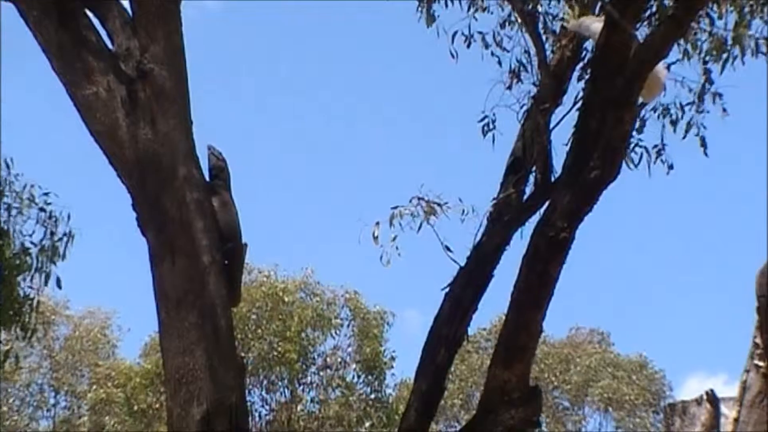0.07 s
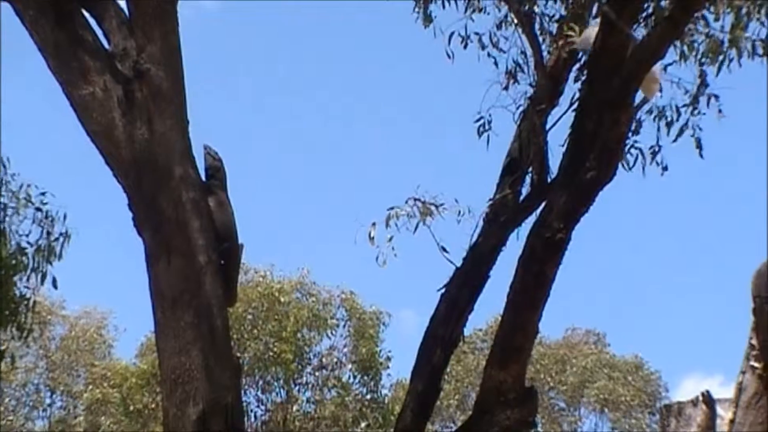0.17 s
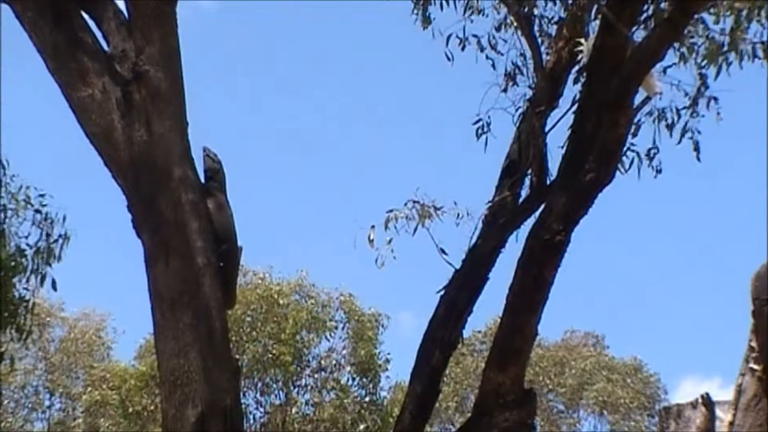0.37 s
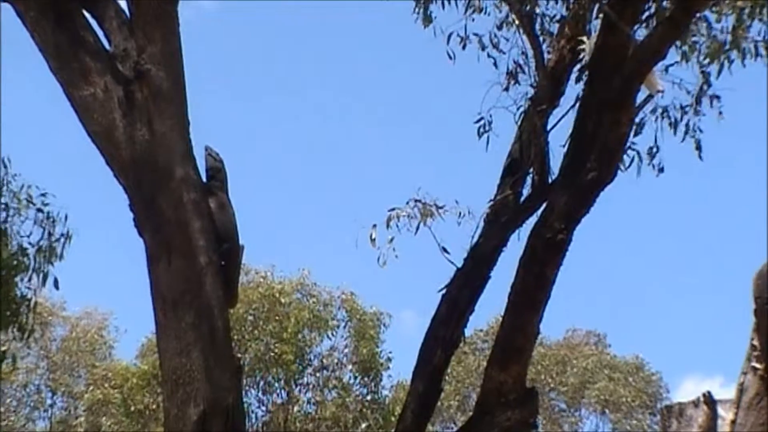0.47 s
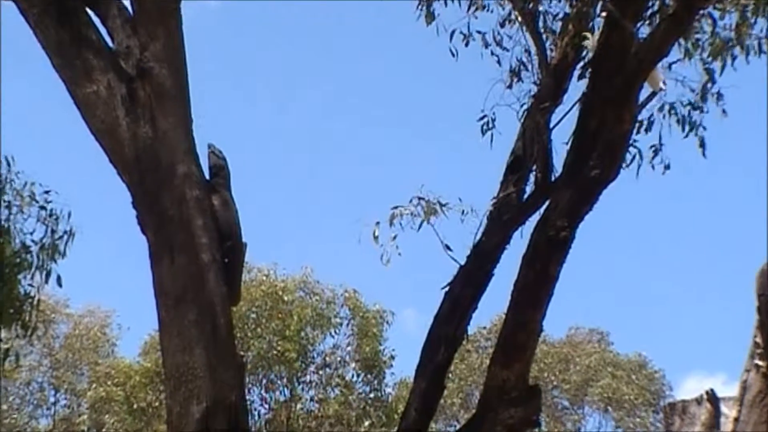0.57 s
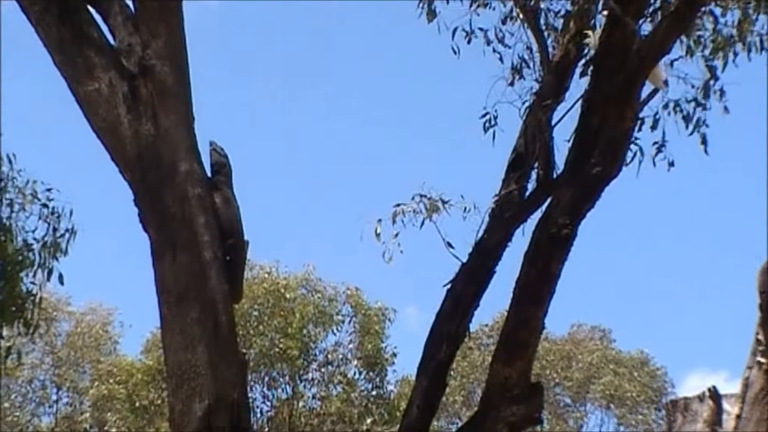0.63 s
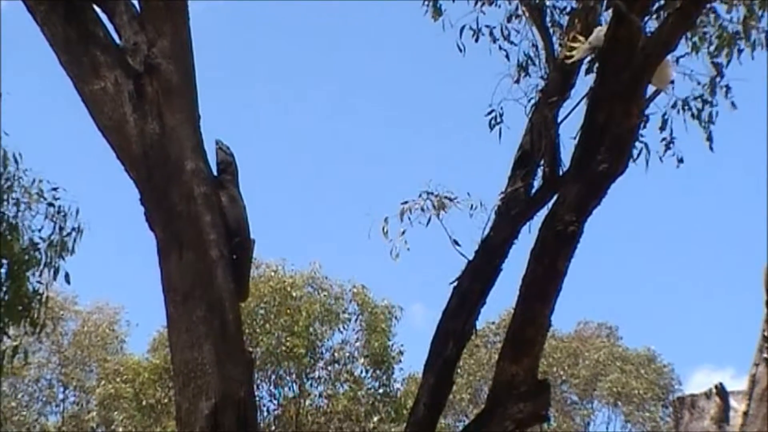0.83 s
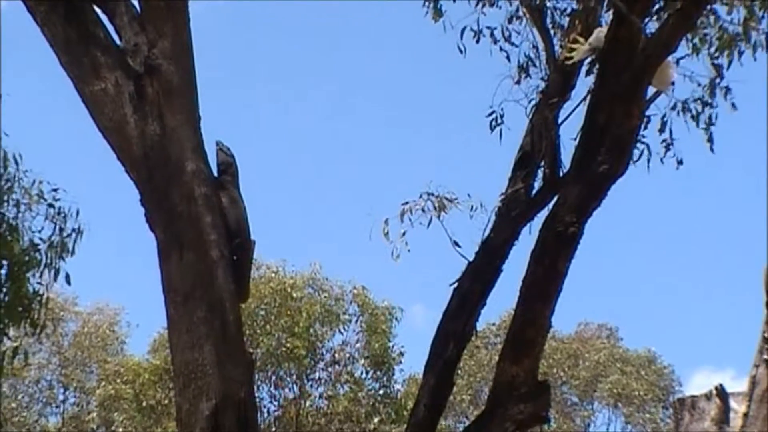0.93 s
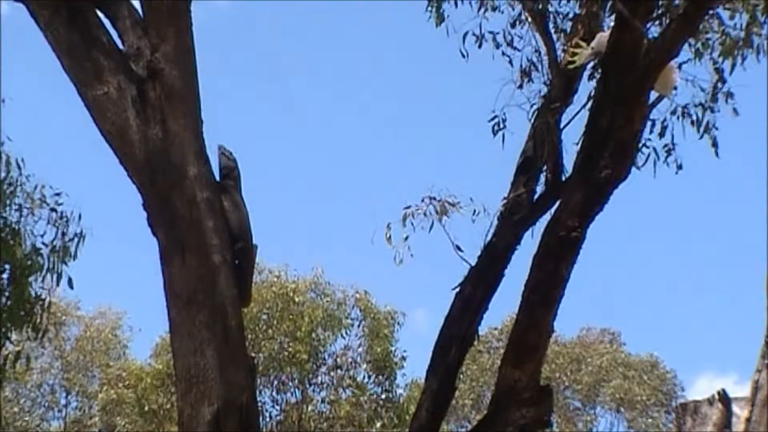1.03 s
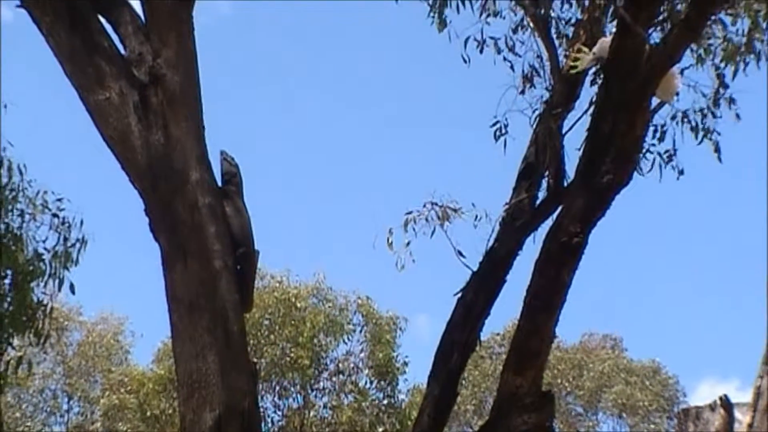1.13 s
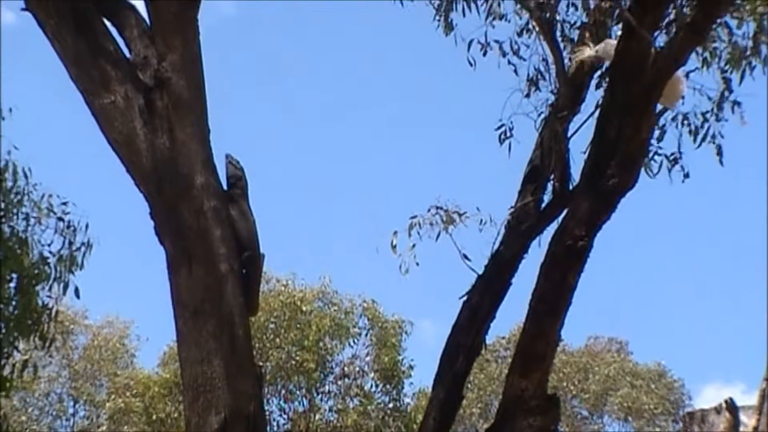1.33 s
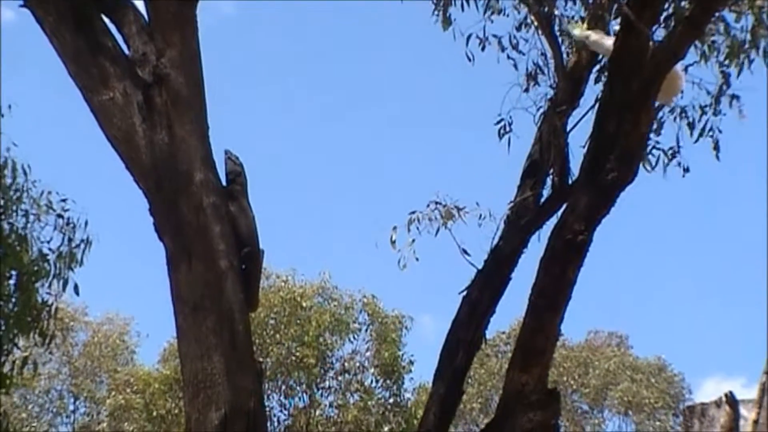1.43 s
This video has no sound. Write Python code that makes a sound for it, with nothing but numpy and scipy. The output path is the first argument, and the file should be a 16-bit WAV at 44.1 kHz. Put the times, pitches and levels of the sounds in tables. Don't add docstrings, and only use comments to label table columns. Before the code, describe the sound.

A large parrot gives one loud, harsh, raspy screech among trees, with a faint echo outdoors

```python
import sys
import numpy as np
from scipy import signal
from scipy.fft import rfft, irfft
from scipy.io import wavfile
from scipy.ndimage import uniform_filter1d

SR = 44100
rng = np.random.default_rng(int(sys.argv[2]) if len(sys.argv) > 2 else 0)


def to_wav(s):
    ch = np.atleast_2d(s).T
    pcm = np.round(np.clip(ch, -1, 1) * 32767)
    wavfile.write(sys.argv[1], SR, pcm.astype(np.int16))


def volts_from_decibels(level):
    exponent = np.asarray(level, float) / 20
    return 10 ** exponent


N = 66150


def evened(x):
    return x / np.sqrt(np.mean(abs(x) ** 2) + 1e-20)


def read(points, hz):
    f, value = np.transpose(points)
    return np.interp(np.log(hz + 1), np.log(f + 1), value)


def resonate(x, hz, width_hz):
    turn = np.exp(2j * np.pi * hz * np.arange(x.shape[-1]) / SR)
    r = np.exp(-np.pi * width_hz / SR)
    return 2 * (turn * signal.lfilter([1 - r], [1, -r], x / turn)).real


def drift(n, hz):
    r = np.exp(-2 * np.pi * hz / SR)
    z = rng.standard_normal(n) + 1j * rng.standard_normal(n)
    return evened(signal.lfilter([1], [1, -2 * r, r * r], z))


def high_pass(x, order, hz):
    return signal.lfilter(*signal.butter(order, hz, 'high', fs=SR), x)


HUM_HZ, HUM_DB, HUM_WANDER, HUM_SWELL_DB = 80, -48.5, 0.077, 2
BUFFET_DB, BUFFET_HZ = -50, 22


def rumble():
    turns = np.cumsum(HUM_HZ * (1 + HUM_WANDER * drift(N, 5.5).real)) / SR
    hum = []
    for _ in range(2):
        phase = 2 * np.pi * turns + 1.45 * drift(N, 2.3).real
        hum.append(np.cos(phase) * volts_from_decibels(HUM_SWELL_DB * drift(N, 8.6).real))
    wind = drift(N, BUFFET_HZ).real
    wind = evened(signal.lfilter(*signal.butter(2, 45, fs=SR), wind))
    return volts_from_decibels(HUM_DB) * np.array(hum) * volts_from_decibels([[3], [0]]) + volts_from_decibels(BUFFET_DB) * wind * [[1.15], [-.85]]


# f/Hz, level per Hz/dB
AIR_SPECTRUM = [(35, -18), (90, -8), (160, -14), (400, -18), (1200, -22), (3000, -31.5), (6500, -36),
                (12500, -49)]
# f/Hz, left-right correlation [-1 to 1]
COHERENCE = [(25, -0.55), (70, 1), (400, -0.35), (8000, -0.41)]
AIR_DB, AIR_TOP_HZ, PATCH_DB = -45, 12700, 1.5
INSECT_HZ, INSECT_WIDTH_HZ, INSECT_DB = 10070, 1970, -46.5


def air():
    frames, hz = N // 512 + 5, np.fft.rfftfreq(2048, 1 / SR)
    a, b, c, d, patches = rng.standard_normal((frames, 1025, 5)).T
    patches = evened(uniform_filter1d(uniform_filter1d(patches, 16, 0), 8, 1))
    same = np.clip(read(COHERENCE, hz), -1, 1)[:, None]
    left = a + 1j * b
    right = same * left + np.sqrt(1 - same ** 2) * (c + 1j * d)
    z = np.array([left, right])
    wash = volts_from_decibels(AIR_DB) * evened(volts_from_decibels(read(AIR_SPECTRUM, hz)))
    hiss = volts_from_decibels(INSECT_DB) * evened(np.exp(-((hz - INSECT_HZ) / INSECT_WIDTH_HZ) ** 2))
    top = 1 / np.sqrt(1 + (hz / AIR_TOP_HZ) ** 70)
    colour = np.hypot(wash, hiss) * top * np.minimum(hz / 60, 1) ** 3
    unit = evened(z * volts_from_decibels(PATCH_DB * patches)) * np.sqrt(2 / 2048)
    sound = signal.istft(unit * colour[:, None], nperseg=2048, noverlap=1536)[1][:, :N]
    return evened(sound) * np.hypot(volts_from_decibels(AIR_DB), volts_from_decibels(INSECT_DB)) * volts_from_decibels([[1.2], [-1.2]])


# t/s, level/dB, ring f/Hz, ring width/Hz, decay time/s
TICKS = [
    (1.049, -41, 9000, 9000, .003),
    (1.19, -43, 3500, 600, .012),
    (1.206, -50, 7000, 4000, .005),
    (1.17, -53, 6500, 4000, .06),
    (1.235, -55, 6500, 4000, .04),
    (1.215, -43, 2330, 500, .045),
    (1.493, -37, 800, 900, .004),
]


def twigs():
    out = np.zeros((2, N))
    t = np.arange(6000) / SR
    for s, db, hz, width_hz, length in TICKS:
        noise = rng.standard_normal(6000)
        burst = evened(resonate(resonate(noise, hz, width_hz), hz, width_hz))
        burst = burst * np.exp(-t / length) * np.minimum(5 * t / length, 1)
        part = out[:, round(s * SR):][:, :6000]
        part += volts_from_decibels(db) * burst[:part.shape[1]]
    return out


SWAY_HZ, SWAY_FROM_HZ = 120, 1400


def swayed(x):
    low = signal.filtfilt(*signal.butter(3, SWAY_FROM_HZ, fs=SR), x)
    return low + (x - low) * drift(N, SWAY_HZ).real * np.sqrt(2)


def sparse(length):
    taps = np.zeros((2, length))
    at = np.arange(0, length - 20, 20)
    at = at + rng.integers(0, 20, (2, len(at)))
    np.put_along_axis(taps, at, rng.choice([-1., 1.], at.shape), 1)
    return taps


def spread(x, taps):
    return signal.fftconvolve(x[None], taps / np.linalg.norm(taps[0]), axes=1)[:, :N]


# f/Hz, decay time to -60 dB/s
DECAY = [(250, 0.88), (900, 0.98), (1740, 1.23), (4590, 1.27), (9000, 0.49)]
TREES_DB = -13.5
LEAVES_DB, LEAVES_S, LEAVES_HZ = -5.5, 0.01, 1490
ECHO_S, ECHO_DB, ECHO_HZ, ECHO_WIDTH_HZ, ECHO_SMEAR_S = .48, -34, 2240, 4500, 0.022


def trees(x):
    t = np.arange(SR) / SR
    leaves = sparse(SR) * np.exp(-t / LEAVES_S) * (t > .001)
    hz, frames, z = signal.stft(sparse(SR) * np.minimum(t / 0.026, 1), SR, nperseg=256)
    decay_db = -60 * frames / read(DECAY, hz)[:, None]
    tail = signal.istft(z * volts_from_decibels(decay_db), SR, nperseg=256)[1]
    late = sparse(SR) * np.exp(-((t - ECHO_S) / ECHO_SMEAR_S) ** 2)
    dull = resonate(resonate(x, ECHO_HZ, ECHO_WIDTH_HZ), ECHO_HZ, ECHO_WIDTH_HZ)
    near = volts_from_decibels(LEAVES_DB) * spread(high_pass(x, 1, LEAVES_HZ), leaves)
    diffuse = volts_from_decibels(TREES_DB) * spread(swayed(x), tail)
    return near + diffuse + volts_from_decibels(ECHO_DB) * spread(dull * drift(N, SWAY_HZ).real, late)


# multiple of the held pitch, level/dB
THROAT = [(1, -31), (2, -23), (3, -10.5), (4, -17.5), (5, -16), (6, -5), (7, 2), (8, -4.5), (9, -10.5),
          (10, -19.5), (11, -19.5), (12, -11), (13, -17), (14, -26.5), (15, -20.5), (16, -16), (17, -29),
          (18, -32.5)]
HELD_HZ = 309
CLOSE_S, CLOSE_LEN_S, CLOSE_DB = .783, .018, 13
JITTER, WANDER_HZ, SLOW_WANDER_HZ = .005, 42, 8


def partials(t, hz, turns, rough, beak):
    n = len(t)
    multiple, colour_db = np.transpose(THROAT)
    tone = np.zeros(n)
    for k in range(1, len(THROAT) + 1):
        db = np.interp(k * hz / beak / HELD_HZ, multiple, colour_db)
        if k == 4:
            db = db + CLOSE_DB * np.exp(-((t - CLOSE_S) / CLOSE_LEN_S) ** 2)
        steady = np.exp(.9j * drift(n, SLOW_WANDER_HZ).real)
        wobble = np.sqrt(1 - rough) * steady + np.sqrt(rough) * drift(n, WANDER_HZ)
        tone += volts_from_decibels(db) * (wobble * np.exp(2j * np.pi * k * turns)).real
    return evened(tone)


# f/Hz, level per Hz/dB
RASP = [(450, -31), (800, -19.5), (1450, -21.5), (2200, -8.5), (3700, -18.5), (4350, -26), (5000, -24.5),
        (15000, -41.5)]
# f/Hz, width/Hz, level/dB
PIPE = [(957.3, 54, -11), (2127.4, 118, 1), (2741, 80, -7.5), (695, 210, -21.5), (1865, 70, -7)]
RASP_DB, RASP_GATE, RASP_LOW_HZ, RASP_TOP_HZ, PIPE_DB = -3.5, .8, 400, 13600, -1.5


def breath(t, turns):
    n = len(t)
    puffs = (RASP_GATE + np.exp(-(turns % 1) / .25)) * rng.standard_normal(n)
    f = np.fft.rfftfreq(n, 1 / SR)
    edges = 1 / np.sqrt((1 + (RASP_LOW_HZ / (f + 1)) ** 8) * (1 + (f / RASP_TOP_HZ) ** 20))
    rasp = irfft(rfft(puffs) * volts_from_decibels(read(RASP, f)) * edges, n)
    ring = np.zeros(n)
    for hz, width_hz, db in PIPE:
        ring += volts_from_decibels(db) * evened(resonate(resonate(puffs, hz, width_hz), hz, width_hz))
    ring = volts_from_decibels(PIPE_DB) * evened(ring) * np.clip((t - .2) / 0.051, 0, 1)
    return volts_from_decibels(RASP_DB) * evened(rasp) + ring


# t/s, effort level/dB, pitch f/Hz, roughness [0-1], beak opening [factor on resonances]
CALL = [
    (.168, -39, 244.7, 0.6, 0.95),
    (.205, -16.5, 278, 0.93, 1.145),
    (.24, -12, 303, 0.56, 1),
    (.34, -11.5, 309.2, 0.21, 1.0),
    (0.408, -12, 310, 0.52, 1.0),
    (0.558, -15.5, 307.2, 0.75, 1.0),
    (0.689, -15.5, 307.1, 0.83, 1.0),
    (0.774, -16.5, 310.9, 0.78, 1.048),
    (0.807, -32.5, 317.3, 0.95, 1.13),
]
HARSH_DB, HARSH_AT_S, HARSH_S, HARSH_HZ = 5.5, 0.29, .11, 3600
SHIMMER_HZ, SHIMMER_DB = 70, 2.1
DUCK_DB, DUCK_BACK_S = 0.5, 0.52


def screech():
    s, effort_db, pitch, rough, beak = np.transpose(CALL)
    t = np.arange(s[0], s[-1], 1 / SR)
    n = len(t)
    hz, beak = np.interp(t, s, pitch), np.interp(t, s, beak)
    rough = np.clip(np.interp(t, s, rough), 0, 1)
    turns = np.cumsum(hz * (1 + JITTER * drift(n, 55).real)) / SR
    voice = partials(t, hz, turns, rough, beak)
    voice = voice + np.sqrt(rough + 0.2) * breath(t, turns)
    harsh_db = HARSH_DB * np.exp(-((t - HARSH_AT_S) / HARSH_S) ** 2)
    voice = voice + (volts_from_decibels(harsh_db) - 1) * high_pass(voice, 2, HARSH_HZ)
    voice = evened(voice * volts_from_decibels(SHIMMER_DB * drift(n, SHIMMER_HZ).real))
    out = np.zeros(N)
    out[round(s[0] * SR):][:n] = voice * volts_from_decibels(np.interp(t, s, effort_db) + DUCK_DB)
    return out


def scene():
    bird = screech()
    direct = bird * volts_from_decibels([[0.7], [-0.7]])
    return direct + trees(bird) + air() + rumble() + twigs()


def band_limit(x):
    return signal.sosfilt(signal.butter(12, 15670, fs=SR, output="sos"), x)


def record(dry):
    power_db = 10 * np.log10(abs(uniform_filter1d((dry ** 2).mean(0), 1000)) + 1e-12)
    loud = np.clip((power_db + 30.5) / 10, 0, 1)
    fall = np.arange(N) / SR / DUCK_BACK_S
    held = np.clip(np.maximum.accumulate(loud + fall) - fall, 0, 1)
    mix = np.clip(dry * volts_from_decibels(-DUCK_DB * held), -1, 1)
    return band_limit(mix)


dry = scene()
out = record(dry)
to_wav(out)
```